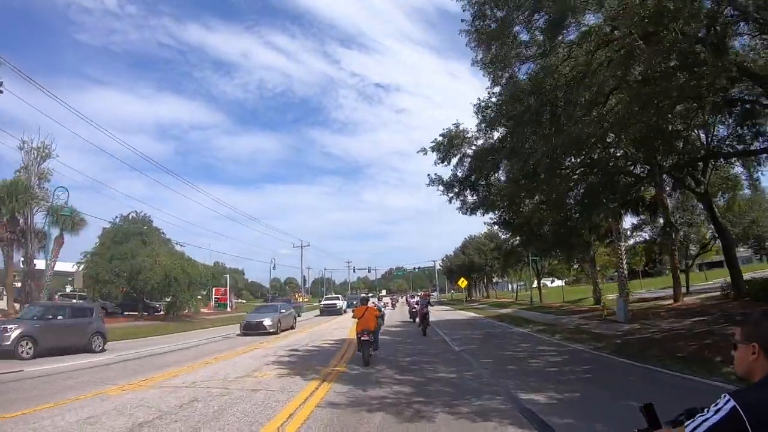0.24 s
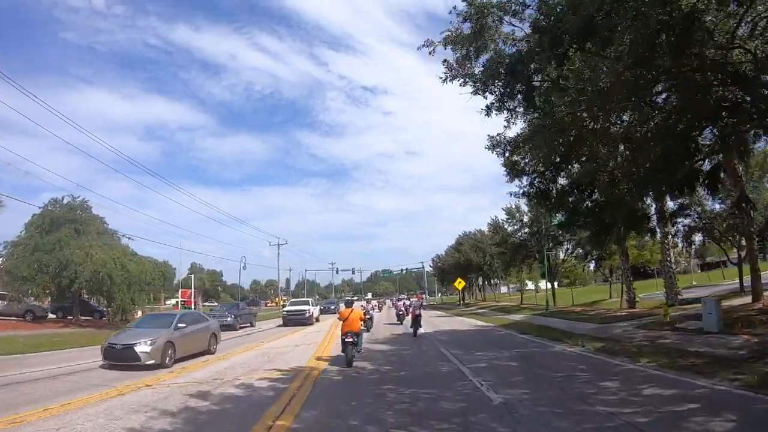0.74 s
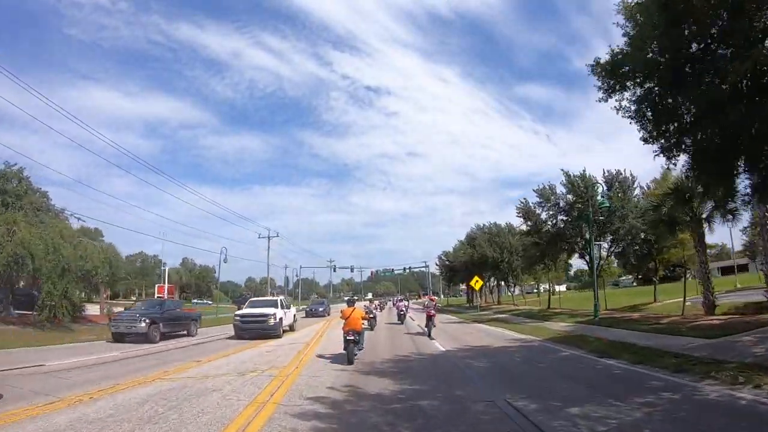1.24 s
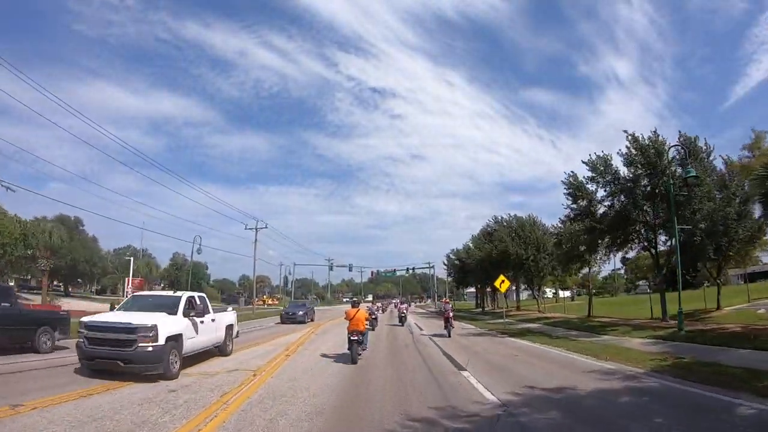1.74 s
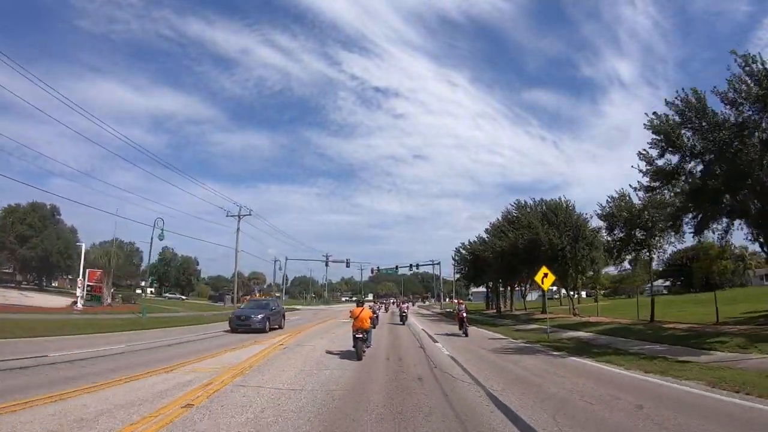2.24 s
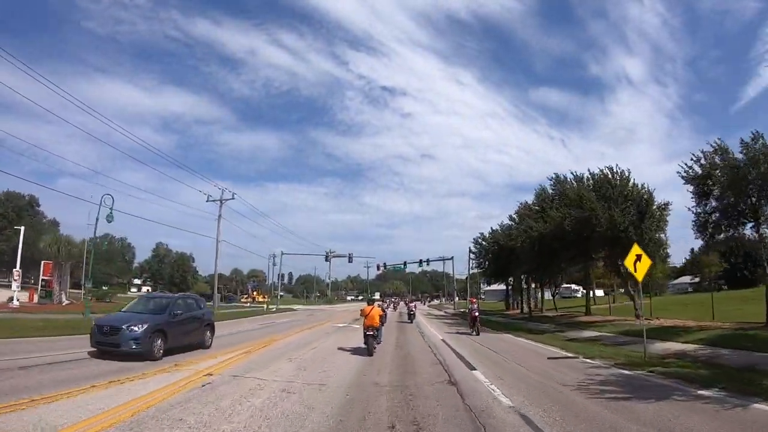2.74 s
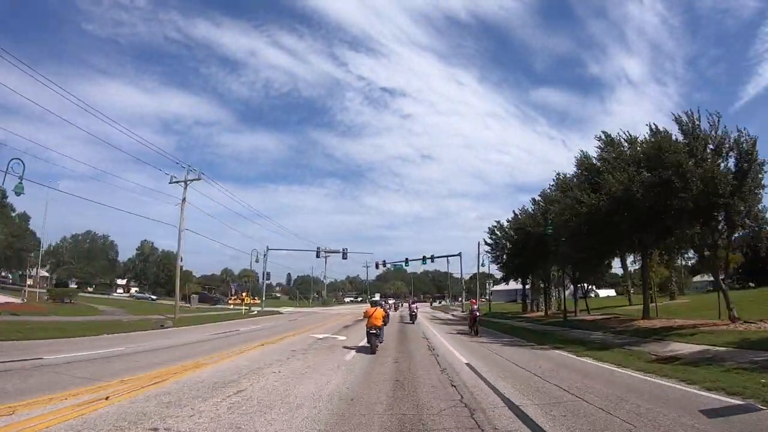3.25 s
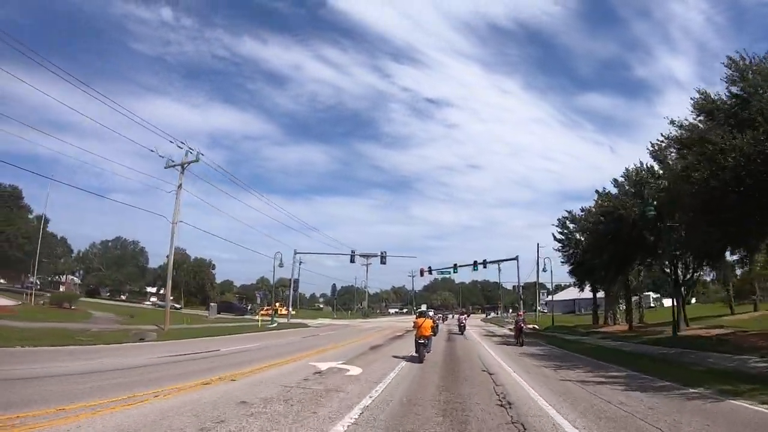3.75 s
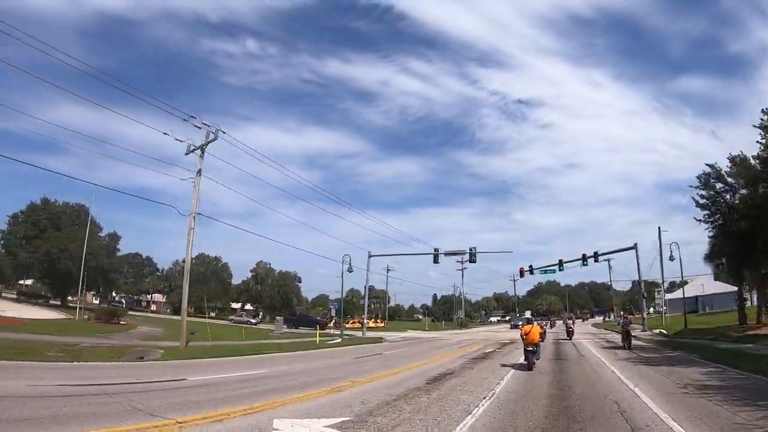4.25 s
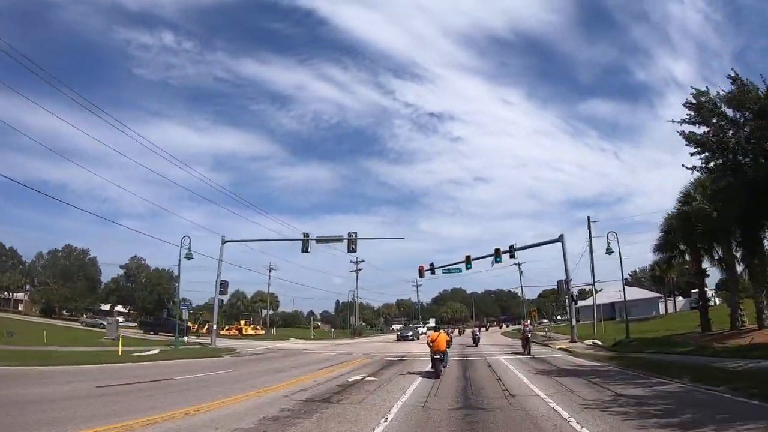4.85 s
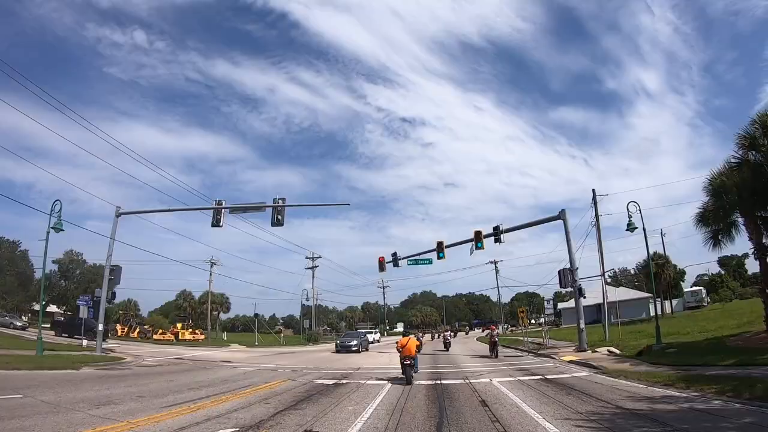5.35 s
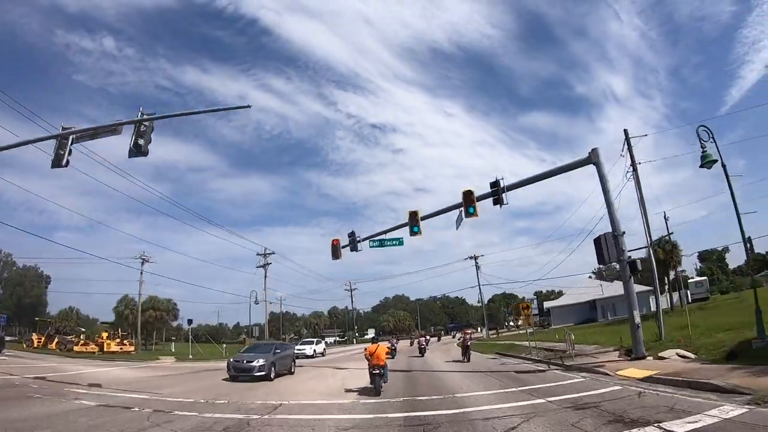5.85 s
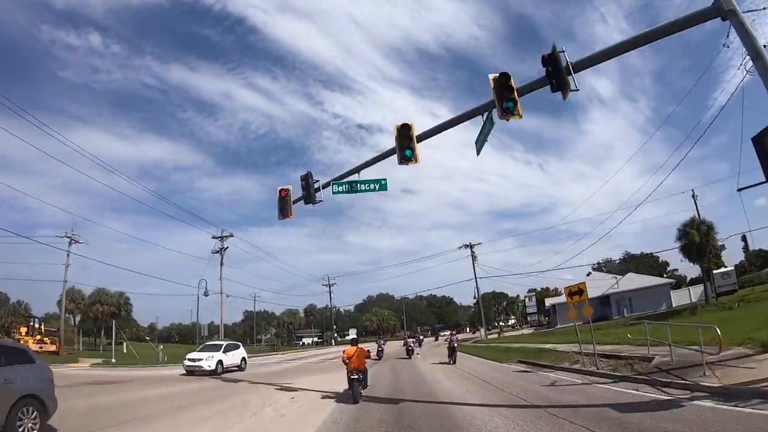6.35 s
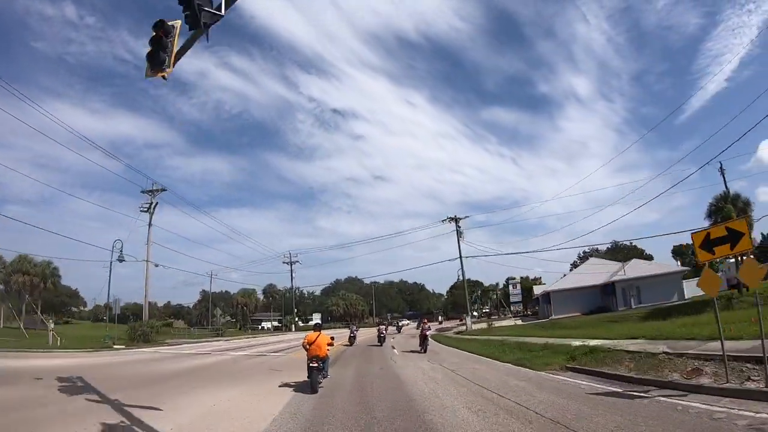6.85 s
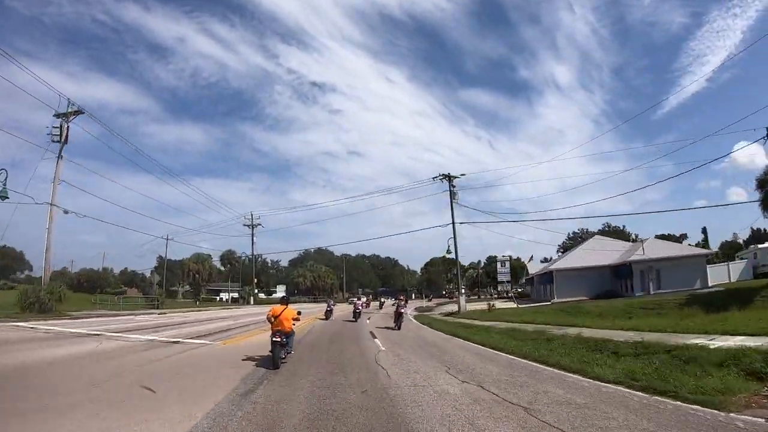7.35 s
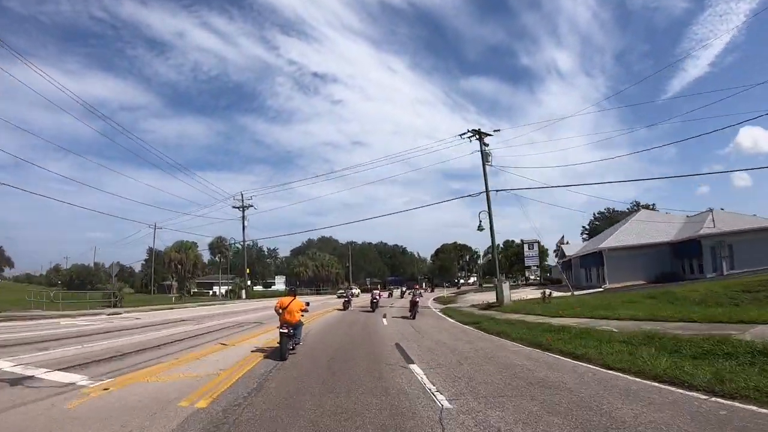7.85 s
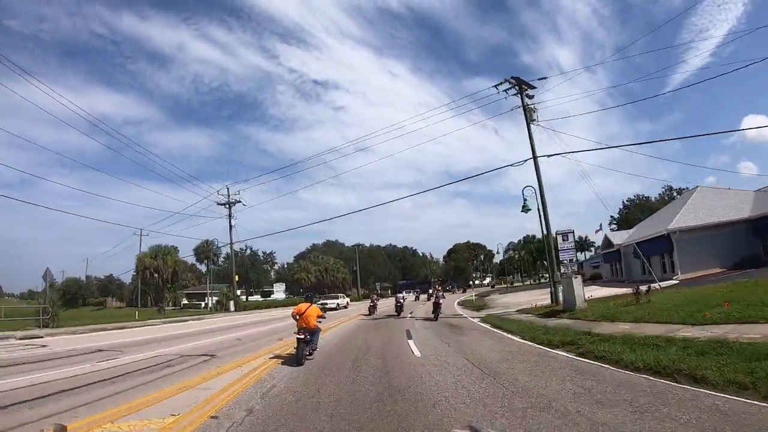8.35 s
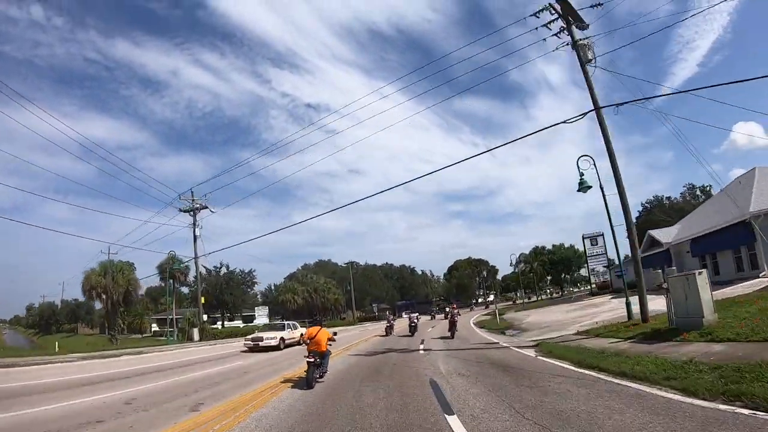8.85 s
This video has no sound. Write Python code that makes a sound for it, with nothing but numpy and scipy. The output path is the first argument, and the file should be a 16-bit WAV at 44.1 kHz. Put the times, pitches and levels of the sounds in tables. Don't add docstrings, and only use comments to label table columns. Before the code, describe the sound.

Onboard motorcycle ride: low thudding exhaust, nearby revs, rising sharp cracks under throttle, a gear change, then stumbling, popping deceleration amid wind and distant bikes.

```python
import sys
import numpy as np
from scipy import signal
from scipy.fft import rfft, irfft, next_fast_len
from scipy.io import wavfile
from scipy.ndimage import uniform_filter1d, map_coordinates

SR = 44100
rng = np.random.default_rng(int(sys.argv[2]) if len(sys.argv) > 2 else 0)


def invert_db(x):
    u = np.asarray(x, float) / 20
    return 10 ** u


def pcm_store(signal):
    levels = np.round(np.clip(np.atleast_2d(signal), -1, 1) * 32767)
    wavfile.write(sys.argv[1], SR, levels.astype(np.int16).T)


N = 401297
TIME_S = np.arange(N) / SR

# pitch_hz, width_hz
BOOM_TONES = [(226, 34.6), (291, 38.5)]


def unit(x):
    return x / np.sqrt(np.mean(x ** 2) + 1e-20)


def curves(rows):
    times, *columns = np.transpose(rows)
    return [np.interp(TIME_S, times, column) for column in columns]


def wobble(rate):
    knots = rng.standard_normal(int(N * rate / SR) + 4)
    return map_coordinates(knots, [np.arange(N) * rate / SR])


def swells(rows):
    total = 0
    for peak, rise, fall, db in rows:
        distance = np.maximum((peak - TIME_S) / rise, (TIME_S - peak) / fall)
        total = total + invert_db(db - 20 * distance)
    return total


def delayed(x, s):
    return np.pad(x, (round(s * SR), 0))[:N]


def filtered(x, response):
    m = next_fast_len(N + SR // 2)
    return irfft(rfft(x, m) * response(np.fft.rfftfreq(m, 1 / SR)), m)[:N]


def colour(points):
    f, db = np.transpose(points)
    return lambda hz: invert_db(np.interp(np.log(hz + 1), np.log(f), db, -120, -120))


def modes(table, turn=-1):
    def response(f):
        total = 0
        for k, (centre, width, db) in enumerate(table):
            ring = 1j * f * width / (centre * centre - f * f + 1j * f * width)
            total = total + turn ** k * invert_db(db) * ring
        return total
    return response


def twice(table):
    return lambda f: modes(table)(f) ** 2


def chambers(table):
    return lambda f: np.prod([modes([(centre, width, 0)])(f) for centre, width in table], axis=0)


def firings(turns):
    return np.interp(np.arange(1, int(turns[-1]) + 1), turns, np.arange(N))


def impulses(at, size):
    return np.bincount(np.clip(np.round(at), 0, N - 1).astype(int), size, N)


def puffs(spikes, t60):
    flare = signal.lfilter([1], [1, -invert_db(-60 / (t60 * SR))], np.abs(spikes))
    return flare * rng.standard_normal(N)


def patchy(spectrum, patchy_db):
    z = signal.stft(rng.standard_normal(N + 512), nperseg=512)[2]
    field = uniform_filter1d(rng.standard_normal(z.shape), 6, 0)
    field = uniform_filter1d(field, 10, 1)
    noise = signal.istft(z * invert_db(patchy_db * unit(field)), nperseg=512)[1][:N]
    return unit(filtered(noise, colour(spectrum)))


def crack(spikes, front_db, sizzle_db):
    # pitch_hz, width_hz, level_db
    tailpipe = [(990, 140, -6.5), (1190, 105, -7.5), (1361, 168, -.4), (1512, 106, -1.7), (1748, 198, 4.3),
                (1960, 210, 2.3), (2290, 190, -6.5), (2600, 200, -16), (2830, 150, -20), (3080, 300, -18)]
    baffle = [(1819, 616, 3.2)]
    hot_gas = [(4740, 1200, 3), (8650, 1400, 2.5), (12500, 3000, -4.5)]

    def outlet(f):
        return 1 / np.sqrt(1 + (820 / (f + 1)) ** 10) / np.sqrt(1 + (f / 3600) ** 8)

    blast = spikes + .03 * puffs(delayed(spikes, .001), t60=.07)
    body = unit(filtered(blast, lambda f: (modes(tailpipe, turn=1)(f) - modes(baffle)(f)) * outlet(f)))
    front = unit(filtered(blast, lambda f: modes([(2700, 2000, 0)])(f) * outlet(f)))
    sizzle = unit(filtered(.4 * spikes + .12 * puffs(spikes, t60=.04), twice(hot_gas)))
    return body + invert_db(front_db) * front + invert_db(sizzle_db) * sizzle


def pulls(speed):
    # opens_s, shuts_s, attack_s, crack_db (at the cruising speed)
    throttle = [
        (3.2, 5.151, 0.42, -27),
        (4.697, 5.16, 0.27, -31),
        (5.313, 5.665, 0.14, -19),
    ]
    cruise_hz, db_per_hz = 43.1, 1.4
    release_s, range_db = 0.11, 25
    held = []
    for opens, shuts, attack, db in throttle:
        away = np.maximum(1 - (TIME_S - opens) / attack, (TIME_S - shuts) / release_s)
        held.append(db - range_db * np.maximum(0, away))
    return np.max(held, axis=0) + db_per_hz * (speed - cruise_hz)


def own_engine():
    # start_s, firings_hz
    firing = [(0.0, 31.68), (0.7, 33.2), (1.59, 34.16), (1.99, 35.0), (2.23, 35.0), (2.87, 35.85),
              (3.16, 35.8), (4.43, 39.67), (4.86, 41.26), (5.18, 44.97), (5.26, 43.92), (5.42, 36.43),
              (5.67, 37.01), (5.87, 35.9), (6.14, 35.72), (7.74, 32.53), (7.78, 32.88), (9.1, 32.45)]
    # start_s, load_db, sharpness_db (of the pulse)
    exhaust = [(0, -11.5, -7), (.8, -13.5, -3.5), (1.5, -11.5, -8), (2.3, -12.5, -4.5), (2.7, -15, -5),
               (3.15, -10.5, -20.5), (4.2, -11, -9.5), (5.1, -11.5, -7), (5.3, -14, -7.5), (5.65, -10, -6),
               (5.98, -19.5, -19.5), (6.26, -17.5, -8), (6.5, -16, -27.5), (7.8, -15.5, -36),
               (8.3, -14, -13), (8.55, -11, -11.5), (9.1, -10.5, -10.5)]
    # pitch_hz, width_hz
    bark_tones = [(445, 83), (490, 70)]
    # pitch_hz, width_hz, level_db
    thud_tone = [(216.8, 73, 0)]
    # time_s, loss_db
    surge = [(3.51, 6), (3.675, 24), (3.777, 9.5), (3.887, 16), (4.008, 17), (4.127, 11), (4.24, 19),
             (4.366, 3.5), (4.48, 0.5), (4.602, 3.5), (4.722, 3.5), (4.846, 7), (4.969, 4.5)]
    # peak_s, building_s, easing_s, level_db
    braking = [(6.64, 2.2, 0.93, 9.5)]
    # time_s, peak_db
    catches = [(6.221, -6.5), (6.249, -6.5), (6.274, -5.5), (6.332, -8), (6.47, -8), (6.503, -9),
               (6.673, -8), (6.734, -8), (6.761, -9), (6.849, -4.5), (6.965, -7), (7.085, -6.5),
               (7.142, -3), (7.322, -8), (7.413, -4), (7.47, -4), (7.505, -5.5), (7.593, -5.5), (7.624, -8),
               (7.776, 0.5), (7.869, -7), (7.902, -6), (7.992, -1), (8.233, -6), (8.326, -12), (8.386, -7)]

    speed, = curves(firing)
    turns = np.cumsum(speed) / SR - .205
    at = firings(turns) - .006 * SR
    boom_db, sharp_db = curves(exhaust)

    shut_s, open_s, travel_s = 5.7, 8.4, 0.27
    steady, rough_most = 0.068, 0.45
    stumble, = curves([(shut_s, steady), (shut_s + travel_s, rough_most),
                       (open_s - travel_s, rough_most), (open_s, steady)])
    coasting = stumble / rough_most

    pull_db = pulls(speed)
    for s, db in surge:
        pull_db = pull_db - db * np.exp(-((TIME_S - s) / 0.016) ** 2)
    steep_db = np.clip(-8 + 3.4 * (pull_db + 25.5), -22, 1.5)
    sizzle_db = np.clip(-27.5 + 2 * (pull_db + 31), -34, -15)

    chance = rng.standard_normal((len(at), 3))
    rough = np.clip(stumble[np.clip(at, 0, N - 1).astype(int)], 0, 1)
    at = at + rough * .0011 * SR * chance[:, 0]
    caught_db = 0
    misfire_db, growth, reach_s = -11, 0.84, 0.024
    for s, db in catches:
        nearness = np.exp(-((at / SR + 0.0013 - s) / reach_s) ** 2)
        caught_db = caught_db + growth * (db - misfire_db) * nearness
    spikes = impulses(at, invert_db(caught_db + rough * 3 * chance[:, 1]))
    gas = spikes + .008 * puffs(spikes, t60=.04)

    boom = invert_db(boom_db - 1.1 - 4.9 * stumble) * unit(filtered(-gas, chambers(BOOM_TONES)))
    bark = unit(filtered(delayed(gas, 0.002306), chambers(bark_tones)))
    bark = invert_db(boom_db + sharp_db - 7.0) * bark

    thud_db = -21.5 - 15 * stumble - 2.5 * np.maximum(speed - 43, 0)
    thud = unit(filtered(-delayed(spikes, .0036), lambda f: modes(thud_tone)(f) / (1 + 1j * f / 520) ** 4))
    thud = invert_db(thud_db) * (1 + swells(braking)) * thud

    hum_db = -20 + 3 * np.minimum(speed - 35.08, 0) * (1 - coasting)
    orders = 0.93 * np.cos(4 * np.pi * turns + 3.08) + 0.2 * np.cos(2 * np.pi * turns - 1.3)
    hum = invert_db(hum_db + 1.5 + 0.79 * wobble(5)) * orders
    third = np.cos(3 * 2 * np.pi * turns + 0.79)
    hum = hum + invert_db(hum_db - 5.5 + 3.0 * wobble(4.7)) * coasting * third

    chuff = unit(filtered(puffs(spikes, t60=0.058), twice([(2310, 3200, 0)])))
    chuff = invert_db(-49.5) * (stumble - steady) / rough_most * chuff

    crack_spikes = impulses(at, invert_db(chance[:, 2] * (.7 + 4 * rough)))
    idle_db = -48.5 + stumble
    cracks = (invert_db(idle_db) + invert_db(pull_db)) * crack(crack_spikes, steep_db, sizzle_db)
    return boom + bark + thud + hum + chuff + cracks


def neighbour():
    # start_s, firings_hz
    firing = [(0, 35), (.8, 37), (.95, 30), (1.3, 28), (1.9, 31.7), (2.06, 32.8), (2.76, 39), (2.94, 40.4),
              (3.1, 42)]
    # peak_s, rise_s, fall_s, rasp_db
    blip_times = [(.32, 0.15, 0.16, -35.5), (.39, 0.084, 0.02, -34), (.56, 0.27, 0.11, -29.5),
                  (.69, 0.058, 0.3, -30), (.78, 0.27, 0.07, -35), (1.08, 0.42, 0.23, -33.5)]
    # peak_s, rise_s, fall_s, rasp_db
    pulling_away = [(2.25, 0.43, 0.43, -40), (2.5, 0.081, 0.62, -34), (2.64, 0.3, 0.5, -40.5),
                    (2.93, 0.66, 0.15, -34), (3.2, 0.21, .2, -41)]
    # peak_s, coming_s, going_s, drone_db
    alongside = [(1.7, 2.5, 2.5, -33)]
    # pitch_hz, width_hz, level_db
    low_tones = [(423, 220, -5), (615, 90, -0.5)]
    rasp_tones = [(796, 98, 1), (1010, 230, 7), (1260, 150, 8), (1456, 170, 7)]
    blip_tones = [(767, 160, 2), (896, 190, 4), (1080, 170, 3), (1240, 180, -0.5), (1484, 200, 0)]
    hiss_tones = [(1680, 170, 8.5), (2100, 340, 3.5), (2360, 180, 6.5), (2463, 150, 7), (3270, 540, -5),
                  (8000, 1200, -31.5)]

    speed, = curves(firing)
    turns = np.cumsum(speed) / SR
    size = invert_db(.6 * rng.standard_normal(int(turns[-1])))
    beats = np.zeros(N)
    for k, beat in enumerate([1.0, .8, .65, .5, .4]):
        at = firings(turns - k / 5.3)
        beats += impulses(at, beat * size[:len(at)])
    lead = .7 * beats + .6 * impulses(firings(turns), size)

    drone = unit(filtered(beats, twice(low_tones)))
    rasp = unit(filtered(beats + .3 * lead + .009 * puffs(beats, t60=.2), twice(rasp_tones)))
    blip = unit(filtered(lead + .035 * puffs(beats, t60=.06), twice(blip_tones)))
    hiss_source = beats + 0.22 * puffs(beats, t60=0.054)
    hiss = unit(filtered(hiss_source, lambda f: modes(hiss_tones)(f) * 1j * f / (1500 + 1j * f)))
    hiss_db = -0.5 - 0.5 * (speed - 36)

    blips = swells(blip_times) * (invert_db(-11.5) * drone + blip + invert_db(-9) * hiss)
    cruising = swells(alongside) * drone
    leaving = swells(pulling_away) * (invert_db(0.5) * drone + rasp + invert_db(hiss_db) * hiss)
    return blips + cruising + leaving


def four_cylinder():
    # start_s, firings_hz, level_db
    engine = [(0, 149.5, -31), (.15, 151.5, -30), (.35, 153.3, -31), (.46, 154.2, -34), (.55, 155, -60),
              (9.1, 155, -120)]
    # multiple, level_db
    overtones = [(3, 6.5), (4, 1.5), (5, -3.5), (7, -28), (10, -21.5)]
    hz, level_db = curves(engine)
    phase = 2 * np.pi * np.cumsum(hz * (1 + 0.007 * wobble(30))) / SR
    tones = sum(invert_db(db + 1.5 * wobble(2.1)) * np.sin(k * phase) for k, db in overtones)
    return invert_db(level_db) * tones


def pack():
    # start_s, drone_db
    loudness = [(0, -17), (.8, -16.5), (1.3, -17), (2.4, -17), (2.6, -19), (3.8, -22.5), (4.5, -25.5),
                (5.15, -24), (5.32, -20), (5.5, -34), (5.75, -22.5), (7.2, -22), (7.9, -21.5), (8.3, -16.5),
                (8.6, -22.5), (9.1, -22)]
    # firings_hz, level_db
    far_engines = [(25, 3.5), (31, 0), (41, 0.5), (48, 6.5)]
    # pitch_hz, level_db
    drone_tone = [(40, -27.5), (70, -6), (100, -7), (160, -2), (220, -1), (300, -8), (380, -12.5),
                  (480, -14.5), (700, -36), (1200, -44), (3000, -94.5)]
    beat = np.zeros(N)
    for rate, db in far_engines:
        at = firings(np.cumsum(rate * (1 + .05 * wobble(.6))) / SR)
        beat += impulses(at, invert_db(db + 1.5 * rng.standard_normal(len(at))))
    engines = unit(filtered(beat, colour(drone_tone)))
    return invert_db(curves(loudness)[0] + 3.5) * (0.6 * engines + 0.55 * patchy(drone_tone, patchy_db=1))


def air():
    # abreast_s, approach_s, leaving_s, rush_db
    traffic = [(.68, 2, 3, -58.5), (2.76, 0.48, 0.92, -51), (5.25, 0.15, 1.1, -62.5), (6.5, 1.5, 3.9, -58),
               (8.31, 0.58, 0.33, -61.5)]
    # peak_s, building_s, easing_s, level_db
    gusts = [(7.6, 0.52, 0.31, 5), (3.7, 0.19, 0.28, 4.5), (3.9, 0.37, .15, -2.5), (2.3, 0.6, 0.43, 6.5)]
    # pitch_hz, level_db (per Hz)
    buffet_tone = [(8, -33), (20, -9.5), (40, -1.5), (70, 8.5), (130, -4), (300, -38), (1000, -93.5)]
    rush_tone = [(300, -25.5), (500, 0), (800, -11), (1300, -15.5), (2000, -20), (3200, -24), (4800, -29),
                 (5600, -36), (8000, -34.5), (10000, -39), (12000, -46.5), (15500, -60.5)]
    # start_s, level_db
    chain_level = [(0, -69.5), (.3, -76.5), (1.3, -78.5), (1.45, -80), (2.5, -86.5), (3, -82), (5, -90.5),
                   (9.1, -91.5)]

    buffet_db = -38.5 + 1.98 * TIME_S
    thump = invert_db(buffet_db + wobble(5.2)) * (1 + swells(gusts)) * patchy(buffet_tone, patchy_db=0)
    links = unit(filtered(rng.standard_normal(N), twice([(12300, 500, 6), (13600, 4600, -1.5)])))
    chain = invert_db(curves(chain_level)[0] + 16 + 4 * wobble(25)) * links
    rush_gain = (invert_db(-59.5) + swells(traffic)) * invert_db(21.5 + 0.76 * wobble(11))
    return thump + chain + rush_gain * patchy(rush_tone, patchy_db=1.5)


def afterfire():
    # time_s, peak_db, boom_db
    pops = [(6.2462, -20.5, 0), (6.2761, -19.5, 20), (6.671, -18.5, 1), (6.759, -13.5, 23),
            (6.878, -21, -4), (7.1453, -13.5, 15.5), (7.2649, -19, 7), (7.4118, -18.5, 23),
            (8.182, -21.5, -11), (6.22, -24.5, -6), (6.734, -28, 0), (6.999, -19.5, 0), (7.997, -24.5, 4),
            (8.326, -30.5, -3)]
    s, db, boom_db = np.transpose(pops)
    spikes = impulses(s * SR, invert_db(db))
    flame = filtered(puffs(spikes, t60=0.025),
                     lambda f: modes([(1400, 1300, 0)])(f) / (1 + 1j * f / 4500) ** 2)
    sharp = invert_db(-59) * crack(spikes, front_db=-10, sizzle_db=-26) + invert_db(5) * flame
    boom = filtered(impulses(s * SR, -invert_db(db + boom_db + 46.0)), chambers(BOOM_TONES))
    return sharp + boom


def scene():
    return (own_engine() + neighbour() + four_cylinder() + pack() + air() + afterfire())[None]


def band_limit(x):
    return signal.sosfilt(signal.butter(12, 15700, fs=SR, output="sos"), x)


def record(dry):
    muffled = filtered(dry[0], lambda f: 1 / (1 + 1j * f / 9000) ** 4)[None]
    squeezed = muffled / (1 + np.abs(muffled) ** 4) ** (1 / 4)
    stop_tick = .3 * (np.arange(N) >= N - 3)
    return band_limit(squeezed + stop_tick)


dry = scene()
out = record(dry)
pcm_store(out)
```